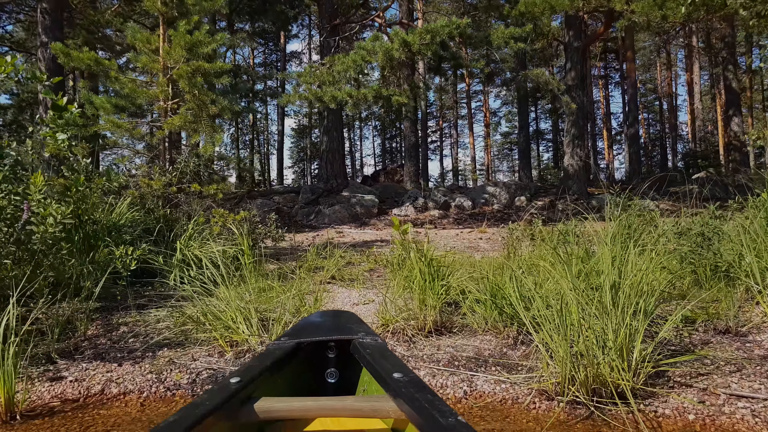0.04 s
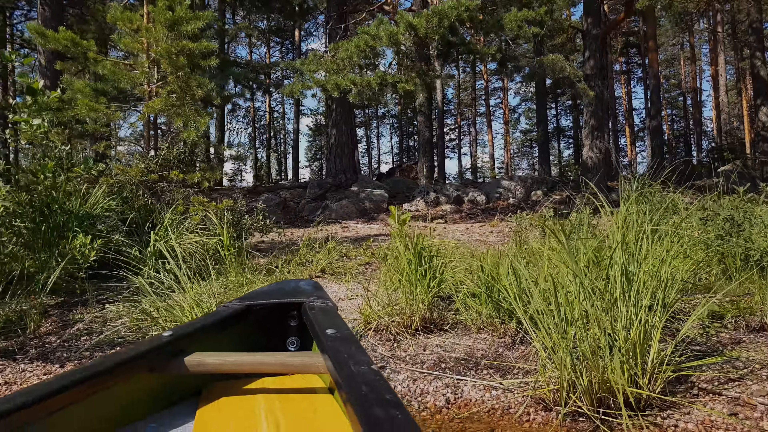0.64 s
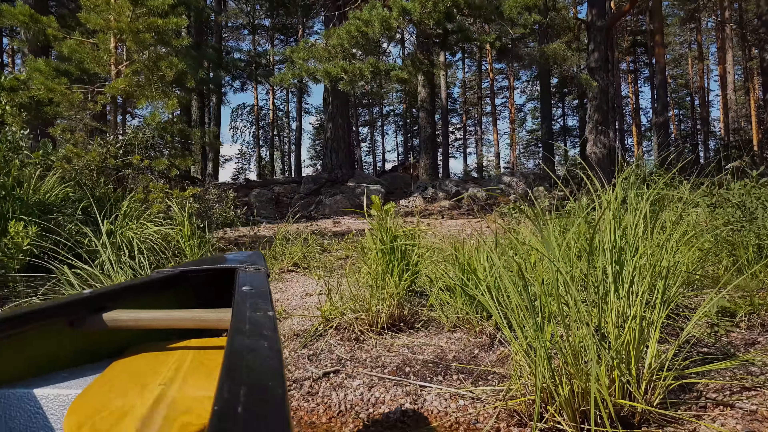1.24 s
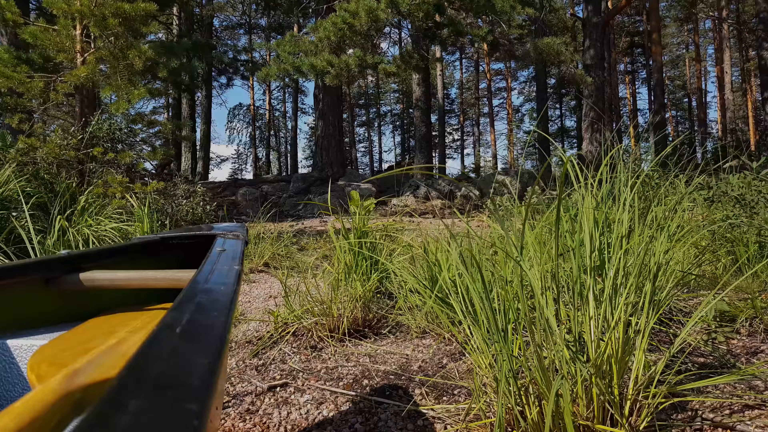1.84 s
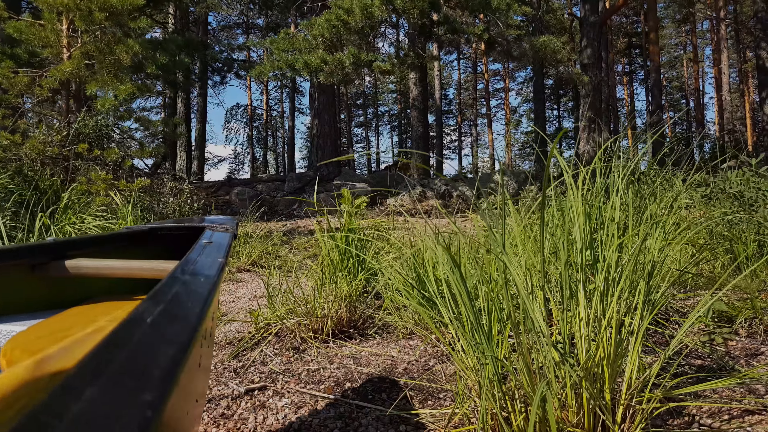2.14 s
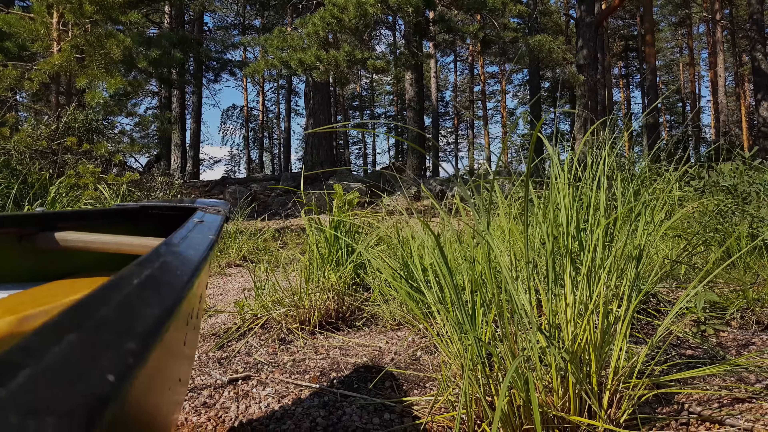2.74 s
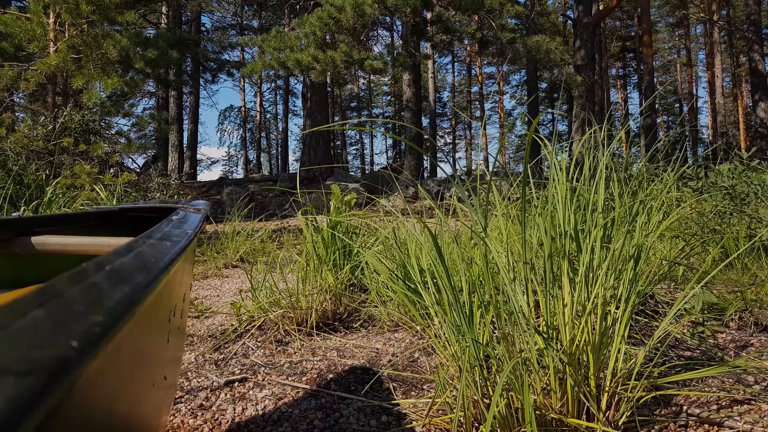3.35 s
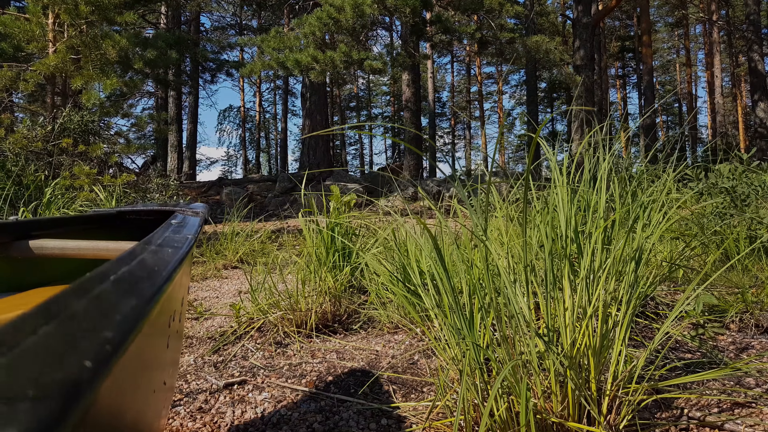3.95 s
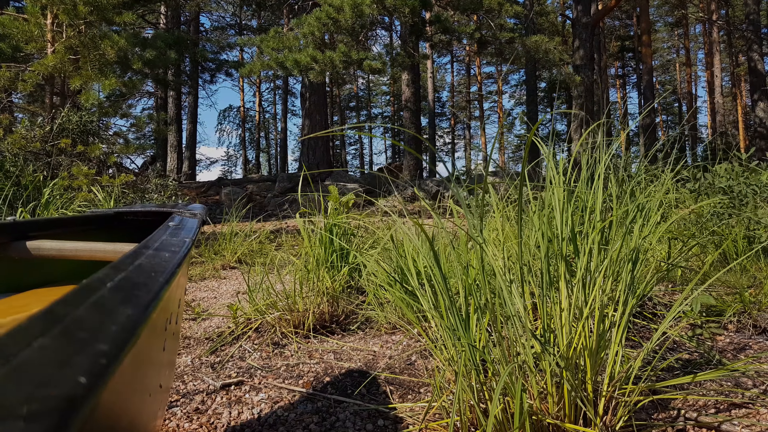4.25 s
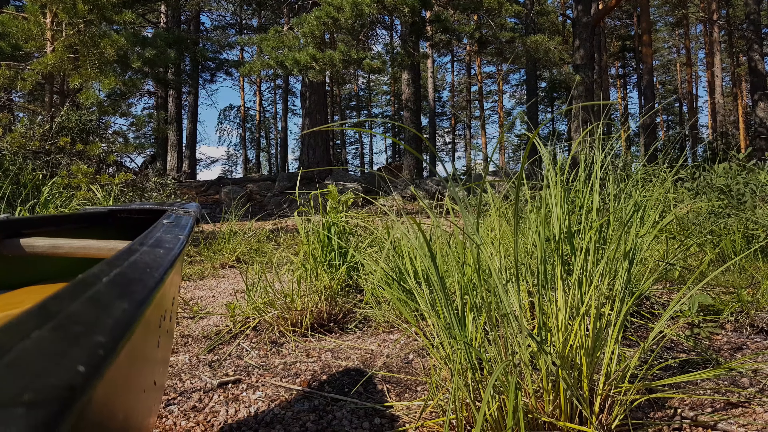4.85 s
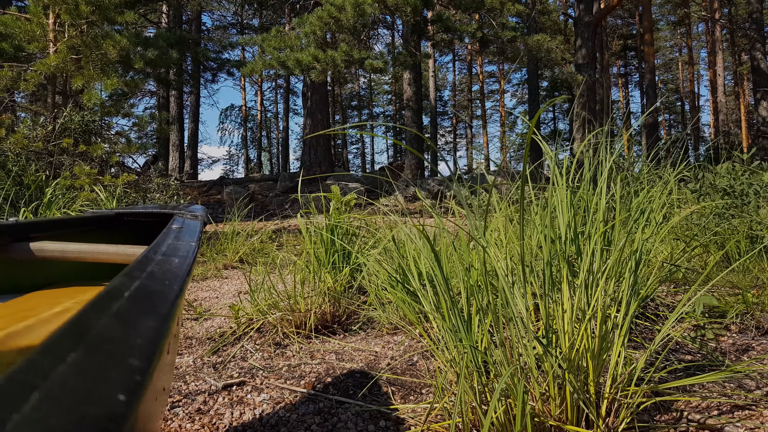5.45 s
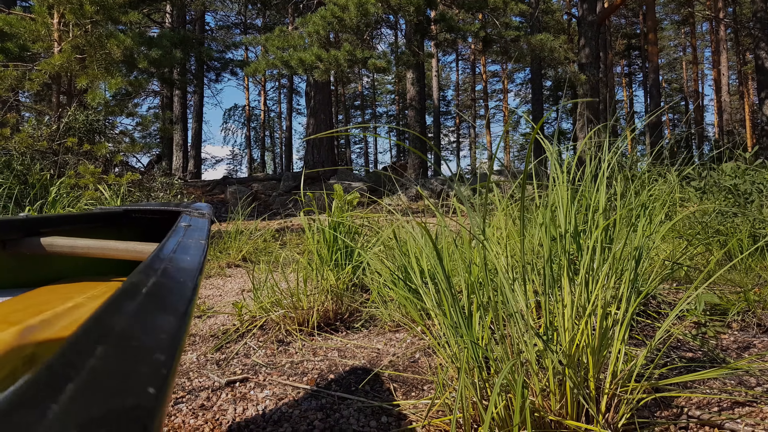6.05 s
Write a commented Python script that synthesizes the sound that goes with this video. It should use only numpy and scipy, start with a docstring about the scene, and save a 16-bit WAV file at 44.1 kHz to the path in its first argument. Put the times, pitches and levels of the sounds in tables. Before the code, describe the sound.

A canoe glides through shallow water, heard close from on board in very faint outdoor air. Bubbles gurgle and plop, with a soft slap of water at about 0.7 seconds. At 1.2 seconds the bow bites loudly into gravel, with several knocks and a sharp crack at 1.5. The keel groans and crunches up the shore, strongest around 1.8, and fades to a stop by 2.4.

The paddler then shifts about, making grit creak, pebbles tick and the boat rumble softly. A hollow knock hits the plastic hull near 3 seconds, followed by a loud cluster of booming thumps with a deep floor thud around 3.5. More knocks come at 4.8 and, softer, at 5.1. Clothing rustles quietly from about 5 seconds. From 5.7 to 6.1 something is dragged along the boat's rim in drumming, creaking jerks, ending with a couple of light taps.

```python
"""Water gurgles as a canoe glides in; then its bow grinds up a gravel shore and stops.
Bubbles ring as resonators, and stick-slip friction on the stones makes the keel groan and crunch.
The paddler shifts about: impacts excite the booming modes of the plastic hull, grit creaks under
the keel, clothing rustles and something is dragged along the gunwale. All is heard from the boat."""
import sys
import numpy as np
from scipy import signal
from scipy.fft import rfft, irfft, next_fast_len
from scipy.io import wavfile
from scipy.ndimage import map_coordinates

SR = 44100
rng = np.random.default_rng(int(sys.argv[2]) if len(sys.argv) > 2 else 0)


def master(y):
    """Save y as 16-bit WAV."""
    cut = np.clip(np.atleast_2d(y).T, -1, 1)
    pcm = np.round(cut * 32767)  # scale
    wavfile.write(sys.argv[1], SR, pcm.astype(np.int16))


N = 273861

# The bow's first bite into the gravel: time_s, push_db
BOW_BITE = [(1.15, -65), (1.213, -32), (1.222, -32.5), (1.245, -29), (1.26, -19.5), (1.3, -18),
            (1.315, -35), (1.44, -39)]
# The long slide up the shore: time_s, groan_db, crunch_db
SHORE_SLIDE = [(1.44, -37.5, -49), (1.53, -36.5, -58.5), (1.65, -40, -47.5), (1.73, -25.5, -32),
               (1.78, -27, -31.5), (1.805, -30, -38.5), (1.98, -31, -40), (2.22, -36, -50),
               (2.37, -55.5, -64.5)]
# The grounded boat shifting on the stones: middle_s, length_s, groan_db, crunch_db
BOAT_SHIFTS = [(2.54, 0.22, -46.5, -54), (2.99, 0.33, -44.5, -50), (3.2, 0.35, -42.5, -52),
               (3.58, 0.11, -41, -63), (4.16, 0.5, -52.5, -56), (4.74, 0.23, -50.5, -53.5),
               (5.35, 1, -58.5, -53.5)]
AGROUND_S, SETTLE_S = 1.21, 0.12  # the boat's weight comes onto the gravel

def keel_gains():
    """Incoherent sources add in power: bite, slide, shifts and rest set groan, crunch and rocking."""
    bite, = gains(BOW_BITE)
    slide_groan, slide_crunch = gains(SHORE_SLIDE)
    shift_groan, shift_crunch = swells(BOAT_SHIFTS)
    aground = ramp(AGROUND_S, SETTLE_S)
    groan = [bite, slide_groan, shift_groan, amp(-55) * aground]
    crunch = [amp(-13) * bite, slide_crunch, shift_crunch, amp(-63.5) * aground]
    rock = [amp(-21) * slide_groan, amp(-2.5) * shift_groan, amp(-50.5) * aground]
    return [np.linalg.norm(parts, axis=0) for parts in (groan, crunch, rock)]


# Spectrum of the groaning hull: frequency_hz, level_db
GROAN_SPECTRUM = [(60, -25), (150, -8), (260, -6.5), (400, 2), (600, 0.5), (870, 2), (1050, -2),
                  (1280, -11.5), (1600, -9), (2100, -15), (4000, -21), (8000, -42)]
# Keel resonances that the stones bow: centre_hz, width_hz, gain_db
KEEL_RESONANCES = [(553, 42, -9.5), (882, 7.8, -16), (1025, 24, -7), (1250, 49, 2), (1508, 24, -5),
                   (1953, 31, -0.5), (3540, 160, -9)]
# Spectrum of crunching gravel: frequency_hz, level_db
CRUNCH_SPECTRUM = [(700, -48), (1300, 6), (1800, 9.5), (2500, 7), (4500, 3.5), (5800, -3), (7500, -0.5),
                   (8900, -8), (10300, 2), (12300, -3), (15500, -25)]

def gravel_scrape(groan, crunch):
    """Stick-slip friction: stones slip in clumps, driving the keel's resonances and crunching."""
    # a hard push crushes many stones at once; at rest only a few shift
    crowd = np.clip(crunch / amp(-35), 0, 1) ** 0.5
    many, few = contacts(rate_hz=6000, spread_db=0.5), contacts(rate_hz=2000, spread_db=2.5)
    slips = (np.sqrt(crowd) * many + np.sqrt(1 - crowd) * few) * amp(1.9 * wobble(70))
    body = unit(resonate(colour(slips, GROAN_SPECTRUM), KEEL_RESONANCES))
    # each stone chatters for a few milliseconds after it slips
    t = np.arange(SR // 50) / SR
    energy = signal.fftconvolve(np.sum(slips ** 2, axis=0), amp(-120 * t / 0.009))[:N]
    chatter = unit(np.sqrt(np.abs(energy)) * noise(N))
    grit = (unit(slips) + 2 * chatter) * amp(1.7 * wobble(110))
    gravel = amp(1) * unit(colour(grit, CRUNCH_SPECTRUM)) + amp(-9.5) * crowd ** 2 * sand_hiss()
    # small stones clink throughout; once the boat is slow, single pebbles stand out
    clinks = amp(-9.5) * pings(pitch_hz=4200, decay_cycles=7, count=3000)
    clinks += amp(-14) * (1 - crowd) * pings(pitch_hz=4500, decay_cycles=14, count=150)
    ground = stereo(amp(1) * groan * body + crunch * gravel, lag_ms=-0.232)
    return (ground + crunch * clinks) * lean_left(0.5)


def sand_hiss():
    """Shot noise: dense impacts of fine grains merge into spurts of hiss."""
    spurts = amp(3 * wobble(30)) * contacts(rate_hz=7000, spread_db=2)
    spectrum = [(4000, -18), (7500, 21.5), (8800, 2), (10200, 23.5), (12000, -9), (15000, -20)]
    return unit(colour(spurts, spectrum))


# Blows on the hull: start_s, knock_db, thump_db, crack_db, thump_hz, cutoff_hz
HULL_BLOWS = [(1.298, -23.5, -28.5, -46, 258, 1200), (1.343, -25.5, -46, -31, 172, 800),
              (1.4527, -21, -25, -10.5, 206.6, 1830), (1.585, -25, -49, -49, 187, 1000),
              (1.634, -28.5, -44, -52, 166, 800), (2.232, -34.5, -38.5, -47, 172, 800),
              (2.3, -40, -45, -41, 147, 1290), (2.471, -29, -61, -30, 151, 1580),
              (2.9456, -22, -24, -15, 118, 1210), (2.982, -33, -33, -50, 126, 400),
              (3.465, -17.5, -26, -28, 139, 1060), (3.472, -25, -36, -23, 138, 1000),
              (3.480, -30, -21.5, -21.5, 137, 910), (3.524, -24, -17, -24.5, 134, 650),
              (3.556, -26.5, -19.5, -37, 181.4, 547), (3.577, -30.5, -25.5, -38, 188, 550),
              (3.591, -29, -31, -44, 177, 550), (3.618, -34, -35.5, -51, 219, 600),
              (4.06, -41.5, -61, -44, 149, 1600), (4.227, -39, -64, -37.5, 150, 1600),
              (4.783, -22.5, -24.5, -21, 144.5, 590), (4.818, -33, -27.5, -45, 132, 400),
              (4.846, -31, -34, -32, 176.5, 1110), (5.1, -28, -31, -39, 144, 450),
              (5.173, -52, -36, -38, 111, 700), (5.601, -39, -37.5, -63, 160.5, 592)]
THUMP_T60_S, THUMP_RISE_S = 0.23, 0.0028  # the struck panel bulges and swings back
BOOM_LAG_S = 0.0011  # the whole hull answers just after the contact

def hull_knocks():
    """Impact excitation: a blow cracks, thumps a panel and rings the hull; soft contacts are dull."""
    out, t = np.zeros((2, N)), np.arange(SR // 2) / SR
    for start_s, knock_db, thump_db, crack_db, thump_hz, cutoff_hz in HULL_BLOWS:
        knock = amp(knock_db - 19) * dull(panel_rattle(t), cutoff_hz)
        crack = amp(crack_db - 28.5) * contact_crack(t)
        ring = dull(hull_ring(t, low_db=thump_db + 2, high_db=knock_db - 10.5), cutoff_hz)
        bulge = amp(thump_db - 60 * t / THUMP_T60_S) * (1 - np.exp(-t / THUMP_RISE_S))
        thump = bulge * np.sin(2 * np.pi * thump_hz * t)
        add(out, start_s, stereo(knock + crack, lag_ms=-0.23))
        add(out, start_s + BOOM_LAG_S, ring + thump)
    return out


# Spectrum of a struck panel: frequency_hz, level_db
PANEL_SPECTRUM = [(40, -20.5), (110, -10), (190, -4.5), (380, 2.5), (700, 0), (1100, -1.5), (1600, -16),
                  (3000, -10.5), (8000, -116)]
# Decay times of the panel: frequency_hz, t60_s
PANEL_DECAY = [(150, 0.39), (500, 0.12), (1200, 0.047), (4000, 0.27)]

def panel_rattle(t):
    """Frequency-dependent damping: each band of the panel's noisy response dies at its own rate."""
    hz, age_s, bands = signal.stft(noise(len(t)), SR, nperseg=256)
    decay = amp(-60 * age_s / along(PANEL_DECAY, hz)[:, None])
    rattle = signal.istft(bands * decay, SR, nperseg=256)[1][:, :len(t)]
    return unit(colour(rattle * (1 - np.exp(-t / 0.00033)), PANEL_SPECTRUM))


# Spectrum of the crack at the contact: frequency_hz, level_db
CRACK_SPECTRUM = [(400, -36), (1250, 11), (1900, 7.5), (3400, 0), (5500, -12.5), (7500, -22), (11000, -29),
                  (15000, -45)]

def contact_crack(t):
    """Contact noise: grit is crushed under the blow in a quick run of crunches."""
    decay = amp(-60 * t / 0.012) + amp(-7 - 60 * t / 0.08)
    crush = decay * (1 - np.exp(-t / 0.0003)) * amp(2.5 * wobble(400)[:len(t)])
    return unit(colour(crush * noise(len(t)), CRACK_SPECTRUM))


# Normal modes of the hull: pitch_hz, level_db, t60_s
HULL_MODES = [(63.6, -23, 0.52), (98, -19, 0.42), (159.5, -15.5, 0.36), (236.5, -9, 0.233),
              (342, -4.5, 0.14), (393, -2.5, 0.22), (443, -2, 0.16), (543, -20.5, 0.62), (613, -33, 0.19),
              (728, -1, 0.075), (1017, 1, 0.092)]
DETUNE = 0.03  # the modes shift with the spot struck and the load on it

def hull_ring(t, low_db, high_db, crossover_hz=400, scatter_db=3):
    """Modal superposition: weight drives the hull's low modes, hardness the high ones."""
    hz, mode_db, t60_s = np.transpose(HULL_MODES)[:, :, None]
    hz = hz * (1 + DETUNE * rng.standard_normal(hz.shape))
    drive_db = low_db + (high_db - low_db) * hz ** 2 / (hz ** 2 + crossover_hz ** 2)
    level_db = drive_db + mode_db + scatter_db * rng.standard_normal(hz.shape)
    envelope = amp(level_db - 60 * t / t60_s) * (1 - np.exp(-t * hz))
    phase = rng.uniform(0, 2 * np.pi, hz.shape) + 0.54 * rng.standard_normal((2,) + hz.shape)
    return np.sum(envelope * np.sin(2 * np.pi * hz * t + phase), axis=1)


# Weight settling on the boat's floor: start_s, level_db
FLOOR_THUDS = [(2.96, -52), (3.585, -31), (4.802, -42), (5.17, -34)]

def floor_thuds(pitch_hz=62, rise_s=0.0055, t60_s=0.19):
    """Damped oscillation: shifting weight heaves the whole floor with a soft, deep bump."""
    out, t = np.zeros((2, N)), np.arange(SR // 2) / SR
    push = (1 - np.exp(-t / rise_s)) ** 2 * amp(-60 * t / t60_s)
    heave = np.sin(2 * np.pi * pitch_hz * t + np.array([[0], [-0.8]]))
    for start_s, level_db in FLOOR_THUDS:
        add(out, start_s, amp(level_db + 0.5) * push / push.max() * heave)
    return out


# Jerks of something dragged along the gunwale: middle_s, length_s, boom_db, rasp_db, slip_rate_hz
DRAG_JERKS = [(5.752, 0.045, -38, -43.5, 325), (5.778, 0.061, -32, -43, 293), (5.853, 0.043, -28, -38, 194),
              (5.9, 0.097, -29.5, -45, 160), (5.94, 0.052, -34, -46.5, 150),
              (6.015, 0.074, -39.5, -47, 199)]

def gunwale_drag():
    """Relaxation oscillation: an uneven train of slips drums on the hull and creaks in the gunwale."""
    boom, rasp = swells([row[:4] for row in DRAG_JERKS])
    rate_hz = np.interp(np.arange(N) / SR, *np.transpose(DRAG_JERKS)[[0, 4]])
    cycles = np.cumsum(rate_hz * amp(wobble(40) + 2 * wobble(300))) / SR
    slips = unit(np.diff(np.floor(cycles), prepend=0) * amp(2 * rng.standard_normal(N)))
    # each slip is a clean tick and a brief rasp
    chatter = signal.fftconvolve(slips, np.exp(-np.arange(SR // 50) / SR / 0.002))[:N]
    rub = unit(chatter * noise(N)) + slips * np.array([[1], [0]])
    drum = unit(colour(rub, [(60, -18), (110, -2), (155, 4.5), (200, -11.5), (245, 5), (300, -9.5),
                             (370, -5.5), (500, -15), (1000, -18), (2000, -50.5)]))
    creak = gunwale_creak(rub, rate_hz)
    return stereo(amp(0.5) * boom * drum + amp(5) * rasp * creak, lag_ms=-0.02) * lean_left(1)


# Spectrum of the rubbing contact: frequency_hz, level_db
RASP_SPECTRUM = [(300, -20), (700, -6), (1400, 9.5), (2000, 5.5), (2700, -3), (4500, -3.5), (7500, -20.5),
                 (14000, -67)]
# Gunwale resonances: centre_hz, width_hz, gain_db
GUNWALE_RESONANCES = [(700, 60, 6), (1424, 43, 10), (1890, 45, 14.5), (2250, 52, 12), (2580, 70, 17.5)]

def gunwale_creak(rub, rate_hz):
    """Forced resonance: rubbing excites the gunwale's narrow peaks; fast slips sound brighter."""
    creak = unit(resonate(colour(rub, RASP_SPECTRUM), GUNWALE_RESONANCES))
    # the contact point travels, so the resonances wander
    travel = np.cumsum(1 + 0.025 * wobble(35))
    creak = np.array([np.interp(travel, np.arange(N), channel) for channel in creak])
    fast = (rate_hz / rate_hz.max()) ** 2
    bright, dark = unit(np.diff(creak, prepend=0)), unit(dull(creak, 1180))
    return np.sqrt(fast) * bright + np.sqrt(1 - fast) * dark


# Bubbles and drips: start_s, level_db, pitch_hz, glide_octaves
GURGLE = [(0.034, -27.5, 3890, 0.66), (0.524, -39, 2330, 0.24), (0.553, -36, 1460, 0.47),
          (0.65, -18.5, 772, 0.2), (.676, -30, 407, 1.5), (0.691, -34, 1610, 0.31), (0.701, -22, 762, 0.67),
          (0.719, -33, 430, 0.31), (0.733, -31, 1330, 0.24), (.735, -29, 698, 0.39), (.795, -31, 820, 0.27),
          (.888, -41, 443, 0.29), (0.924, -39, 457, 0.54), (0.954, -32, 1950, 0.019),
          (0.953, -31.5, 763, 0.74), (0.959, -34.5, 547, 0.14), (1.027, -37, 429, 0.29),
          (1.076, -36.5, 1470, 0.16), (1.131, -43, 1115, 0.24), (1.174, -30, 707, 0.43)]

def bubbles(life_cycles=57):
    """Bubble resonance: trapped air rings and rises in pitch as it surfaces."""
    out, t = np.zeros((2, N)), np.arange(SR // 5) / SR
    for start_s, level_db, hz, glide_octaves in GURGLE:
        t60_s = life_cycles / hz
        rising_hz = hz * 2 ** (glide_octaves * np.minimum(2 * t / t60_s, 1))
        waver = 0.028 * np.cumsum(rng.standard_normal(len(t)))  # from the heaving surface
        tone = np.sin(2 * np.pi * np.cumsum(rising_hz) / SR + waver)
        plop = unit(colour(noise(len(t)), [(hz / 3, -30), (hz, 0), (hz * 2, -10), (hz * 8, -50)]))
        envelope = amp(level_db - 60 * t / t60_s) * (1 - np.exp(-t * hz / 1.7))
        add(out, start_s, envelope * (np.array([tone, 0 * t]) + amp(-14) * plop))
    return out


LAP_START_S, SLAP_S, SLAP_RISE_S, SLAP_FALL_S = 0.44, 0.639, 0.073, 0.085

def bow_wash():
    """Splash noise of impacts and tiny bubbles: a wavelet slaps the bow, then laps until it grounds."""
    since_peak_s = np.maximum(np.arange(N) / SR - SLAP_S - SLAP_RISE_S, 0)
    slap = np.sqrt(ramp(SLAP_S, SLAP_RISE_S)) * np.exp(-since_peak_s / SLAP_FALL_S)
    lapping = ramp(LAP_START_S, SLAP_S - LAP_START_S) ** 2 * (1 - ramp(AGROUND_S, SETTLE_S))
    tiny_bubbles = dull(pings(pitch_hz=1106, decay_cycles=3.4, count=500), 970)
    fizz = unit(np.diff(tiny_bubbles, prepend=0))
    return np.hypot(amp(-50) * slap, amp(-58.5) * lapping) * (amp(3.5) * splash() + amp(-2.5) * fizz)


# Spectrum of splashing water: frequency_hz, level_db
SPLASH_SPECTRUM = [(200, -42), (380, -7.5), (560, -5.5), (1400, -15), (2000, -15.5), (3800, -24),
                   (6700, -23.5), (11000, -29), (15800, -35)]

def splash():
    """Shot noise: many small impacts of water merge into a soft wash."""
    return unit(colour(contacts(rate_hz=3000, spread_db=3.5), SPLASH_SPECTRUM))


# Brief ticks of pebbles, a water drip and light taps on the hull: start_s, level_db, pitch_hz
SHARP_TICKS = [(0.522, -46, 11400), (1.4854, -35.5, 4100), (1.6175, -32.5, 7400), (2.14, -34, 10800),
               (3.141, -36, 3220), (3.1942, -34.5, 3140), (3.896, -40, 3100), (4.029, -38, 3360),
               (4.061, -42, 10500), (4.228, -43, 8700), (4.792, -40, 9700), (5.149, -35.5, 10900),
               (5.451, -39, 2600), (5.573, -37, 2580), (6.08, -37.5, 2390), (6.1658, -37.5, 2340)]

def sharp_ticks(t60_s=0.03):
    """Impulsive transients: each tick is a fast-decaying burst of noise around one pitch."""
    out, t = np.zeros((2, N)), np.arange(SR // 20) / SR
    for start_s, level_db, hz in SHARP_TICKS:
        spectrum = [(hz / 4, -21), (hz / 1.2, -11), (hz, 0), (hz * 1.2, -11), (hz * 4, -28)]
        tick = colour(noise(len(t)) * amp(-60 * t / t60_s), spectrum)
        add(out, start_s, amp(level_db + 3) * tick / np.abs(tick).max())
    return out


# Spectrum of the rocking hull: frequency_hz, level_db
ROCKING_SPECTRUM = [(25, -24), (55, -7), (80, -5), (104, 7.5), (130, -5), (200, -3), (300, -5),
                    (600, -40.5)]

def hull_rocking():
    """Low-frequency random vibration: the rocking boat rumbles, more on its left side."""
    return rush(ROCKING_SPECTRUM, lag_ms=-0.33) * lean_left(2.5)


# Rustles of clothing: middle_s, length_s, rub_db, hiss_db
CLOTH_RUSTLES = [(4.98, 0.31, -71, -60), (5.245, 0.036, -46, -70), (5.42, 0.25, -49, -56.5),
                 (5.68, 0.22, -72, -57), (5.79, 0.26, -45, -60.5), (6.19, 0.072, -51.5, -73)]
# Spectra of the fabric's rub and of its fine hiss: frequency_hz, level_db
RUB_SPECTRUM = [(90, -28), (200, 5), (650, 6.5), (1400, 2.5), (2900, -2.5), (6400, -16.5), (15800, -42)]
HISS_SPECTRUM = [(2000, -12), (6000, -0.5), (12500, -1), (15800, -4)]

def clothing():
    """Friction noise: sliding fabric rubs and hisses, swelling with each movement."""
    rub_gain, hiss_gain = swells(CLOTH_RUSTLES)
    rub = amp(2.5) * rub_gain * rush(RUB_SPECTRUM, lag_ms=-0.31)
    hiss = hiss_gain * rush(HISS_SPECTRUM, lag_ms=-0.264)
    return (rub + hiss) * lean_left(2.5)


# Spectrum of the outdoor air: frequency_hz, level_db
AIR_SPECTRUM = [(25, -7), (70, -4.5), (113, -2), (222, -24), (291, -9), (486, -10), (955, -26), (3220, -22),
                (4570, -15.5), (8970, -26.5), (15800, -28.5)]

def outdoor_air():
    """Ambient noise: a faint broadband rush, strongest in the bass."""
    return amp(-64.5) * rush(AIR_SPECTRUM, lag_ms=0)


# Likeness of the sound at left and right: frequency_hz, correlation
COHERENCE = [(60, 0.24), (200, 0.72), (700, 0.51), (1500, 0.47), (3000, 0.19), (6000, 0.067), (11000, 0.24)]

def stereo(pair, lag_ms):
    """Partial coherence: two unrelated signals become partly alike; the left lags by lag_ms."""
    angle = lambda hz: np.arccos(np.clip(along(COHERENCE, hz), -1, 1)) / 2
    delay = lambda hz: np.exp(np.outer([-1j, 1j], np.pi * hz * lag_ms / 1000))
    mid, side = filtered(pair, lambda hz: np.array([np.cos(angle(hz)), np.sin(angle(hz))]))
    return filtered(np.array([mid + side, mid - side]), delay)


def lean_left(db):
    """Level panning: the left gains db and the right loses as much."""
    return amp([[db], [-db]])


def contacts(rate_hz, spread_db):
    """A random impulse process: tiny impacts, most weak and a few strong, as a pair of rms 1."""
    hits = rng.random(N) < rate_hz / SR
    size = amp(spread_db * np.minimum(rng.standard_exponential(N), 4))
    angle = rng.uniform(0, 2 * np.pi, N)
    return unit(hits * size * np.array([np.cos(angle), np.sin(angle)]))


def pings(pitch_hz, decay_cycles, count):
    """Free decay of small resonators, scattered in time, pitch and place; rms 1."""
    out, t = np.zeros((2, N)), np.arange(SR // 40) / SR
    for when, weakness, pitch, place in rng.random((count, 4)):
        hz = pitch_hz * 2 ** (2.6 * (pitch - 0.5))
        tone = np.sin(2 * np.pi * hz * t + np.array([[0], [2 * np.pi * place]]))
        add(out, when * N / SR, np.exp(-t * hz / decay_cycles) * tone / (weakness + 0.03) ** 0.6)
    return unit(out)


def rush(spectrum, lag_ms):
    """Coloured noise with a slightly restless level; rms about 1."""
    return unit(stereo(colour(noise(N), spectrum), lag_ms)) * amp(wobble(25))


def noise(samples):
    """Two independent white noises."""
    return rng.standard_normal((2, samples))


def wobble(rate_hz):
    """A smooth random curve with rate_hz knots a second."""
    knots = rng.standard_normal(int(N * rate_hz / SR) + 4)
    return map_coordinates(knots, [np.arange(N) * rate_hz / SR])


def gains(rows):
    """An interpolated envelope for each level column, silent outside the rows."""
    time_s, *levels_db = np.transpose(rows)
    return [amp(np.interp(np.arange(N) / SR, time_s, db, left=-140, right=-140)) for db in levels_db]


def swells(rows):
    """An envelope for each level column: every row is a bell curve, and they add in power."""
    middle_s, length_s, *levels_db = np.transpose(rows)[:, :, None]
    bell = np.exp(-(2 * (np.arange(N) / SR - middle_s) / length_s) ** 2)
    return [np.linalg.norm(amp(db) * bell, axis=0) for db in levels_db]


def ramp(start_s, length_s):
    """A linear rise from 0 that holds at 1."""
    return np.clip((np.arange(N) / SR - start_s) / length_s, 0, 1)


def filtered(x, response):
    """Linear filtering: the spectrum of x times a complex frequency response."""
    n = x.shape[-1]
    padded = next_fast_len(n + SR // 4)
    return irfft(rfft(x, padded) * response(np.fft.rfftfreq(padded, 1 / SR)), padded)[..., :n]


def colour(x, spectrum, size=4096):
    """Minimum-phase filtering to (frequency_hz, level_db) points, so that attacks stay sharp."""
    cepstrum = irfft(np.log(amp(along(spectrum, np.fft.rfftfreq(size, 1 / SR)))))
    cepstrum[1:size // 2] *= 2
    cepstrum[size // 2 + 1:] = 0
    impulse_response = irfft(np.exp(rfft(cepstrum)))
    return signal.fftconvolve(x, impulse_response[None], axes=1)[:, :x.shape[1]]


def resonate(x, peaks):
    """Second-order resonators in parallel with a flat path."""
    peak = lambda hz, centre, width: 1j * hz * width / (centre ** 2 - hz ** 2 + 1j * hz * width)
    return filtered(x, lambda hz: 1 + sum(amp(db) * peak(hz, *shape) for *shape, db in peaks))


def dull(x, cutoff_hz):
    """A second-order low-pass."""
    return filtered(x, lambda hz: 1 / (1 + 1j * np.sqrt(2) * hz / cutoff_hz - (hz / cutoff_hz) ** 2))


def along(points, hz):
    """Interpolation of (frequency_hz, value) points on a log frequency axis."""
    knots_hz, values = np.transpose(points)
    return np.interp(np.log(hz + 1), np.log(knots_hz + 1), values)


def add(track, start_s, sound):
    """Superposition: mix a sound in at start_s."""
    span = track[:, round(start_s * SR):][:, :sound.shape[1]]
    span += sound[:, :span.shape[1]]


def amp(db):
    """Decibels to amplitude."""
    return 10 ** (np.asarray(db) / 20)


def unit(x):
    """Scale to rms 1."""
    return x / np.sqrt(np.mean(x ** 2) + 1e-20)


def scene():
    """Superposition of the landing, the paddler's movements and faint outdoor air."""
    groan, crunch, rock = keel_gains()
    background = rock * hull_rocking() + clothing() + outdoor_air()
    boat = gravel_scrape(groan, crunch) + hull_knocks() + floor_thuds() + gunwale_drag()
    water = stereo(amp(-3) * bubbles() + bow_wash(), lag_ms=0.099) * lean_left(-0.8)
    return boat + water + sharp_ticks() + background


def record(dry, top_hz=15850):
    """Band limiting: nothing passes above top_hz, and a narrow band at 9 kHz leans to the left."""
    tilt = lambda hz: amp(np.outer([1, -1], 3 * np.exp(-((hz - 9000) / 900) ** 2)))
    return filtered(dry, lambda hz: tilt(hz) * (hz < top_hz))


dry = scene()
out = record(dry)
master(out)
```